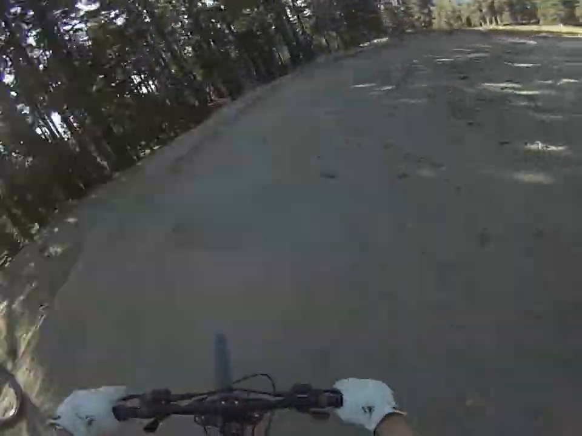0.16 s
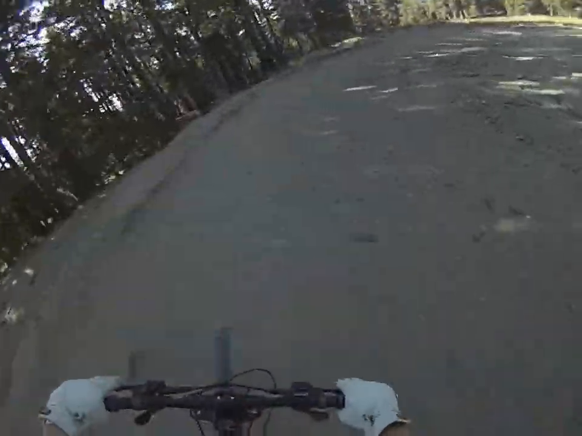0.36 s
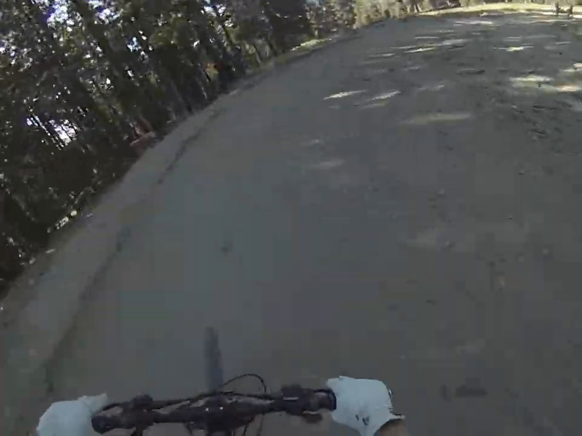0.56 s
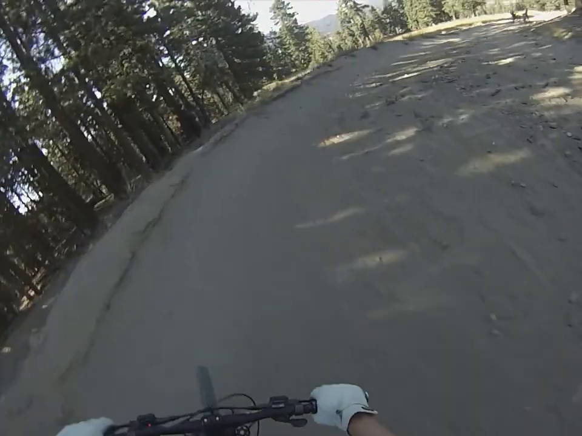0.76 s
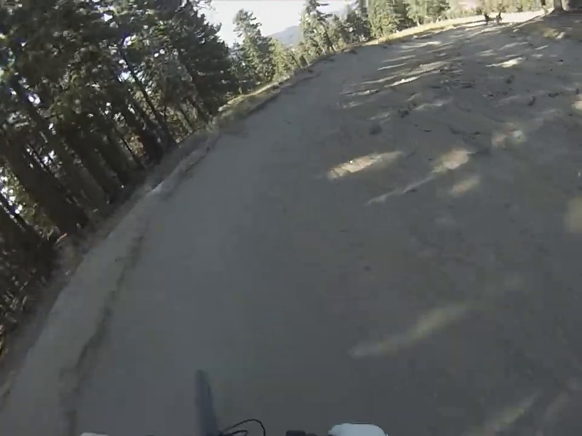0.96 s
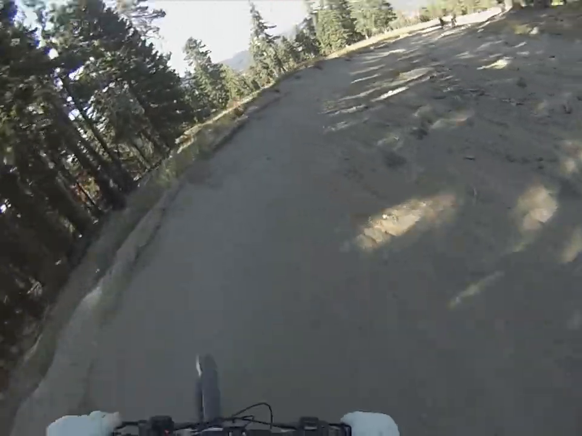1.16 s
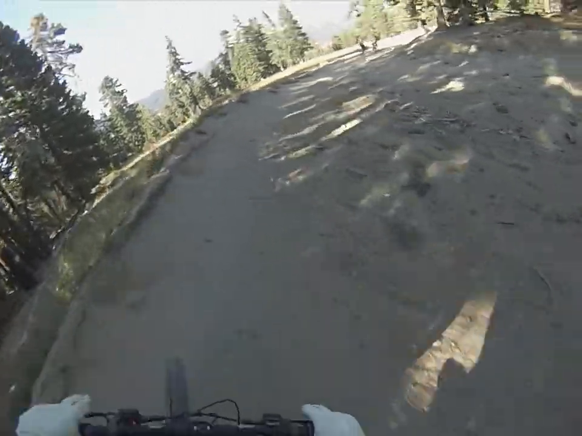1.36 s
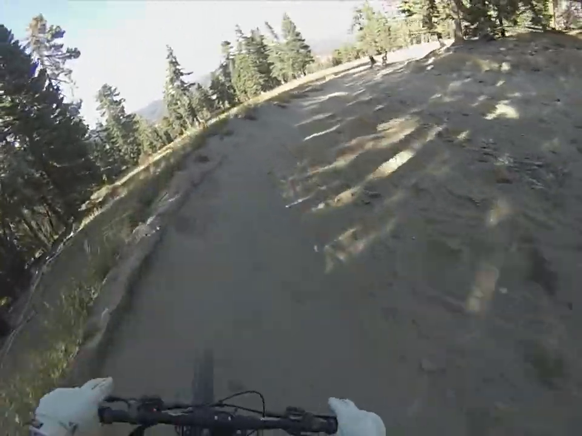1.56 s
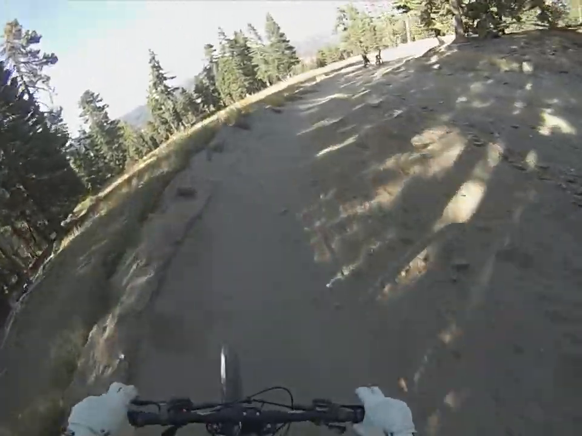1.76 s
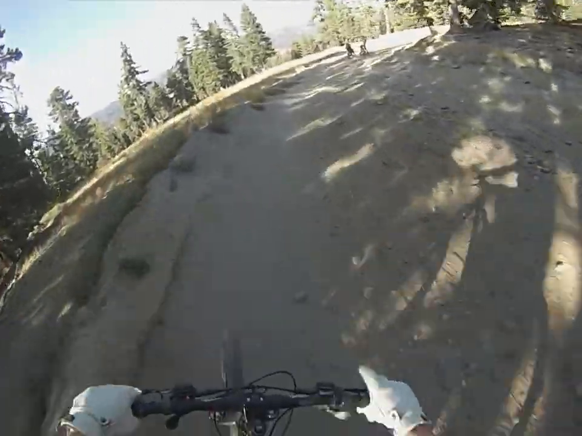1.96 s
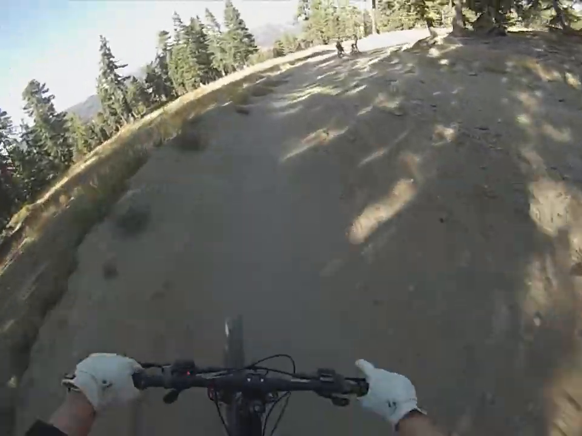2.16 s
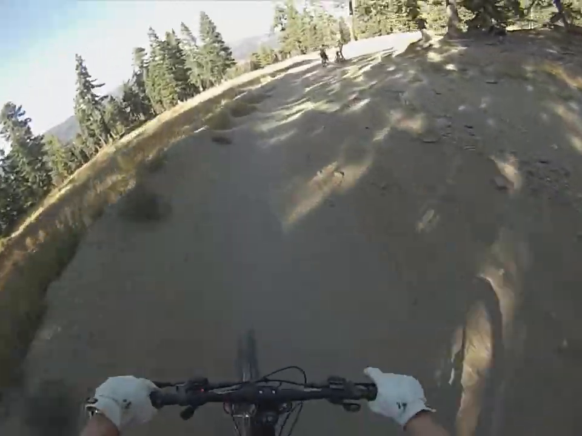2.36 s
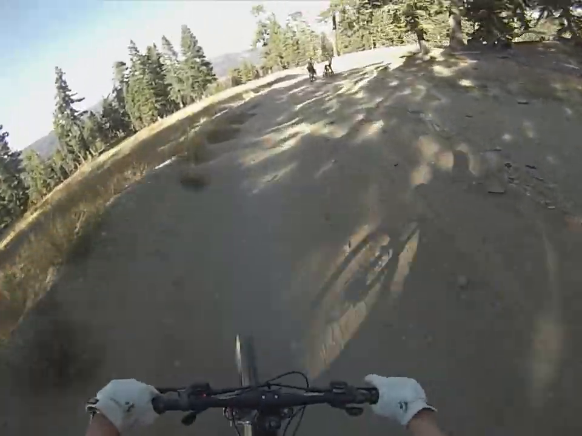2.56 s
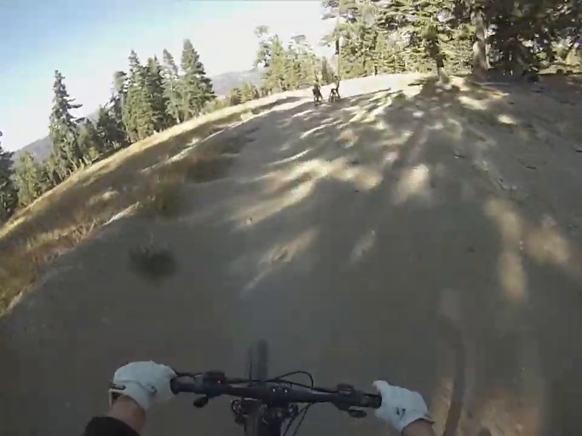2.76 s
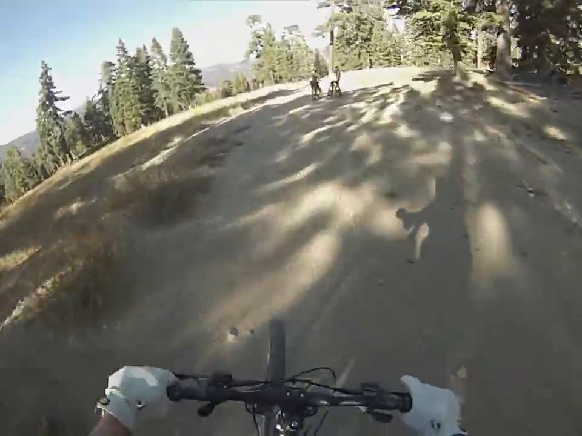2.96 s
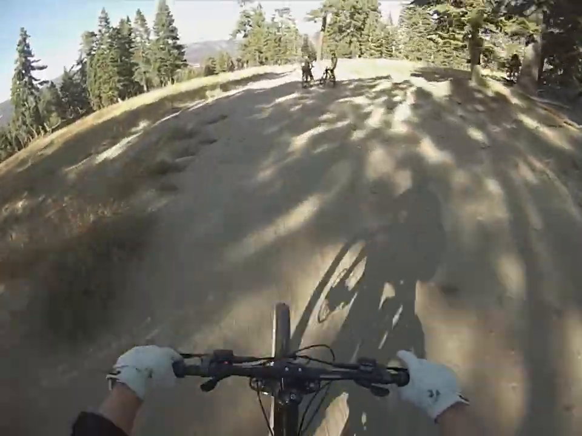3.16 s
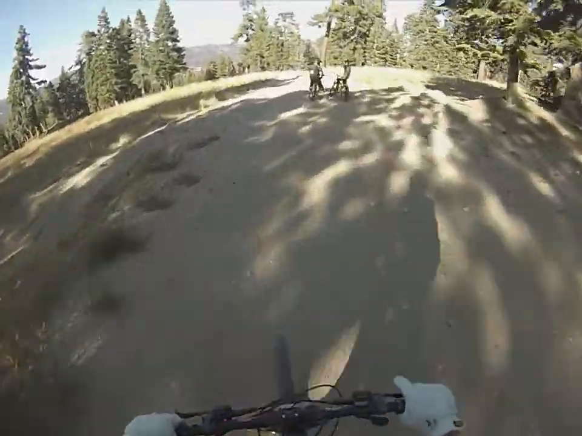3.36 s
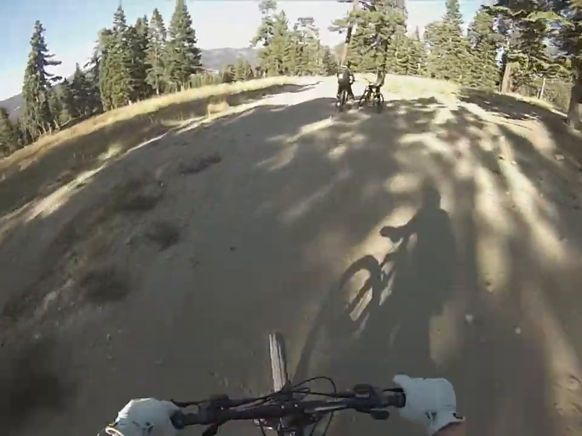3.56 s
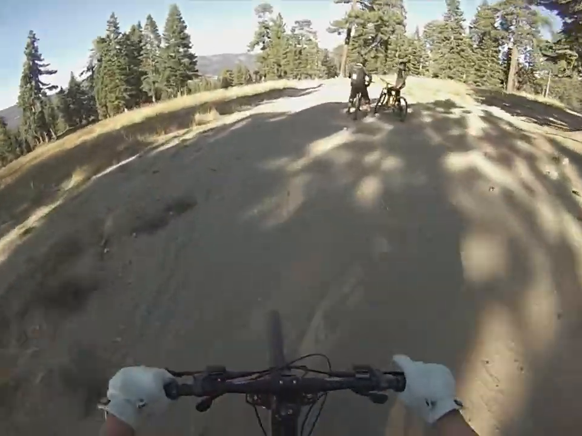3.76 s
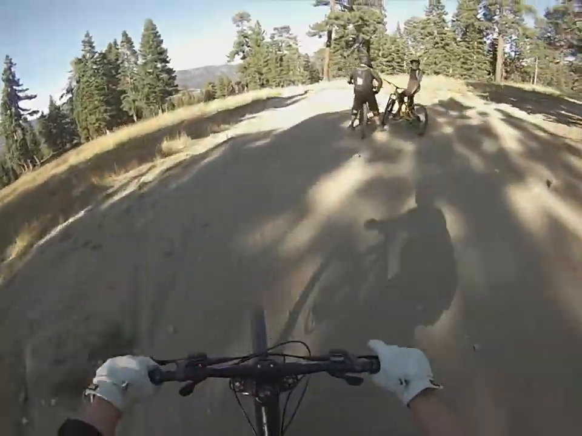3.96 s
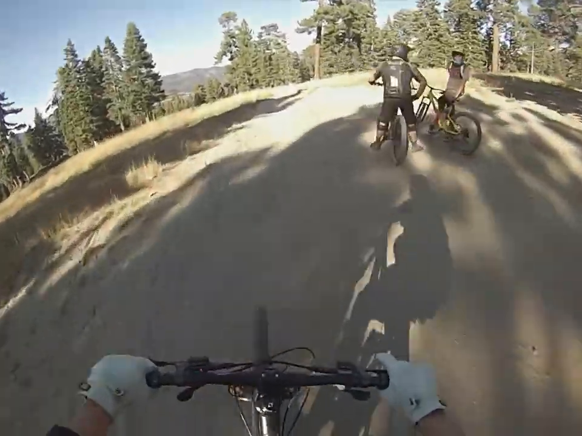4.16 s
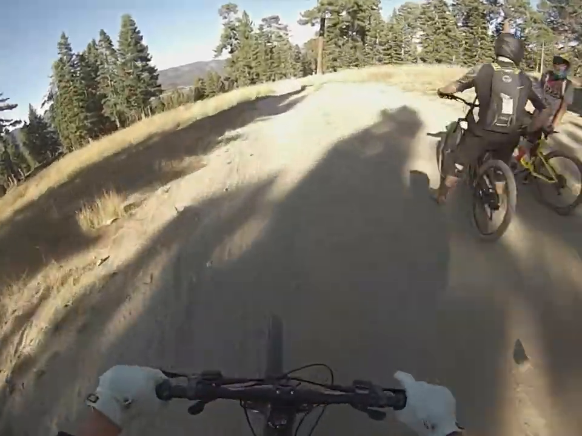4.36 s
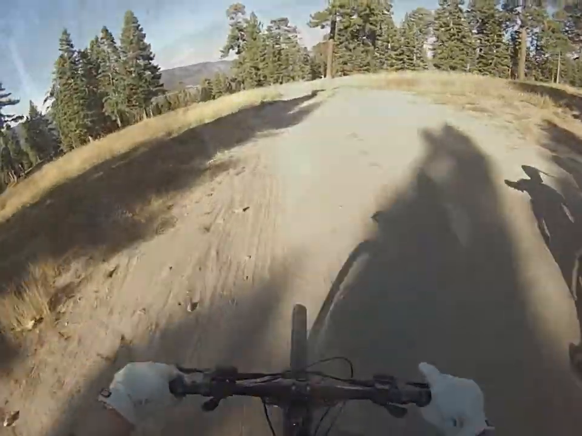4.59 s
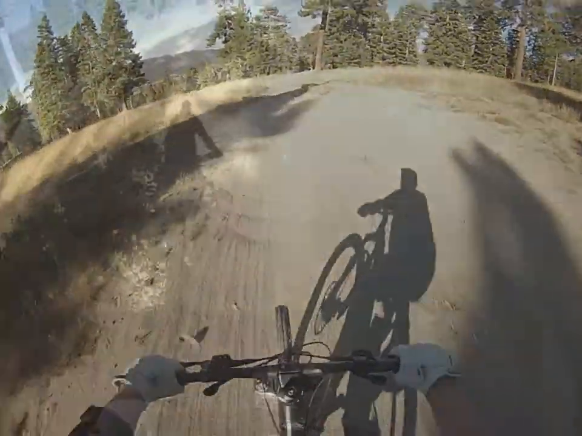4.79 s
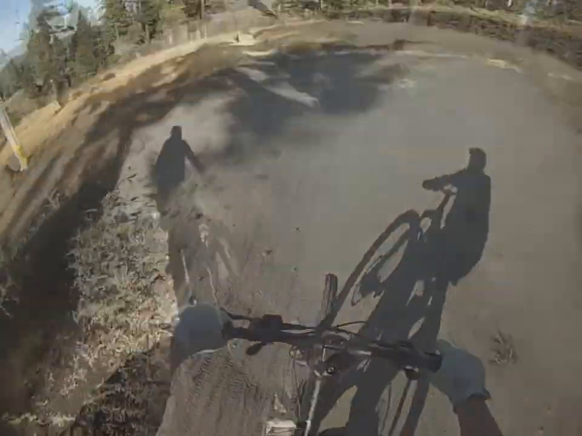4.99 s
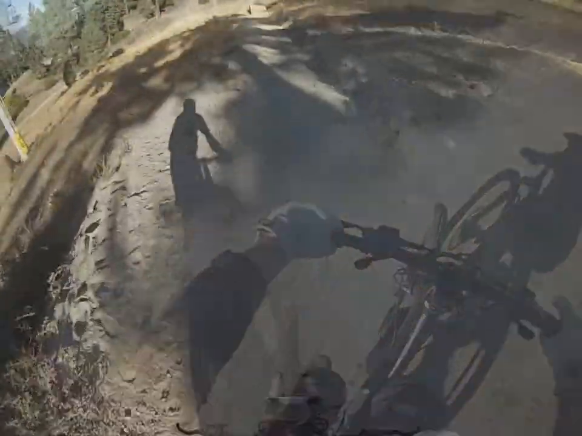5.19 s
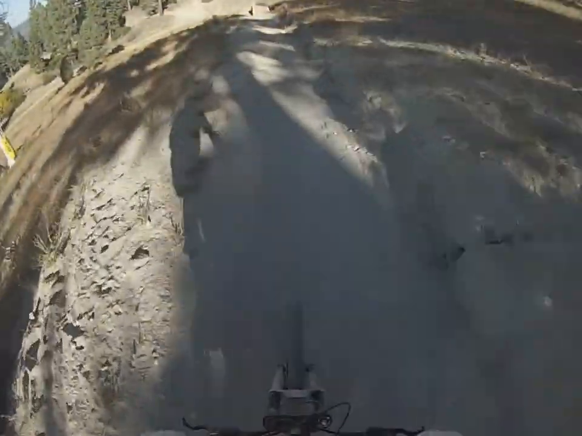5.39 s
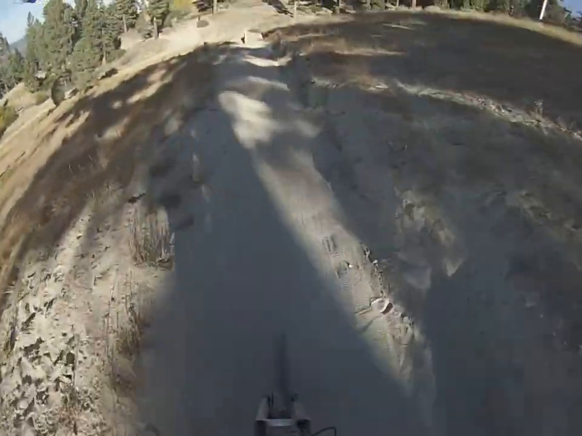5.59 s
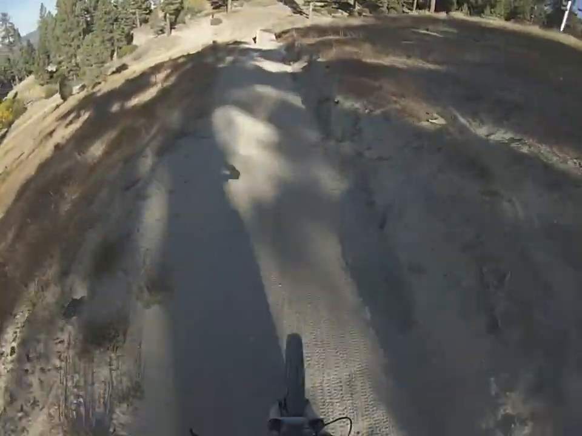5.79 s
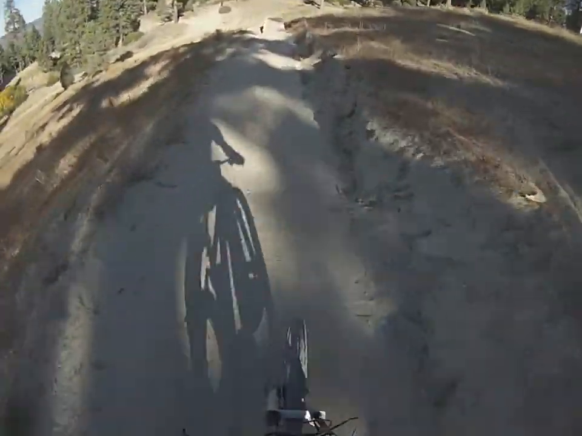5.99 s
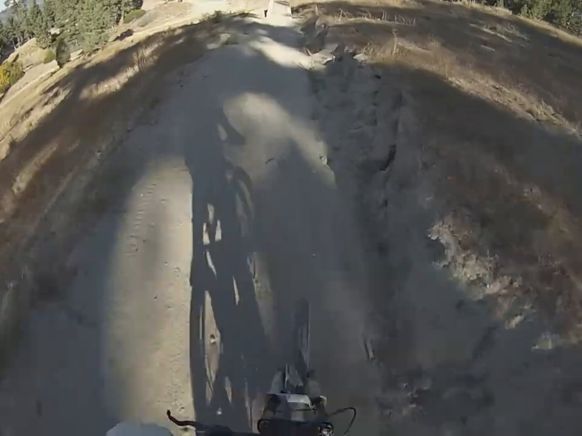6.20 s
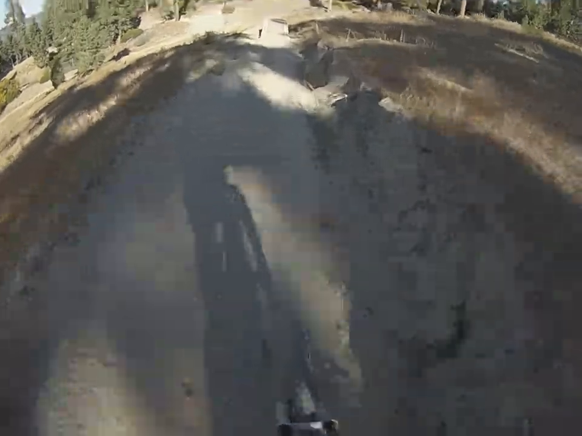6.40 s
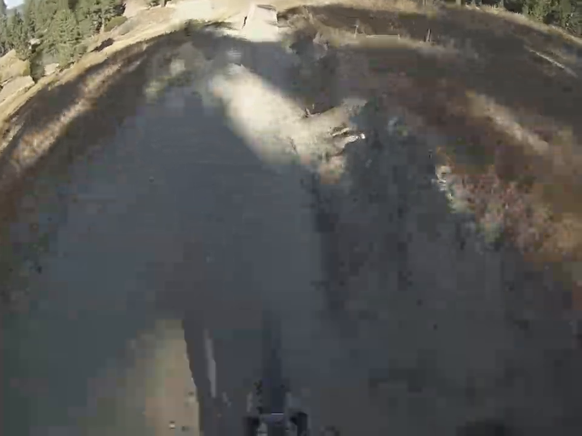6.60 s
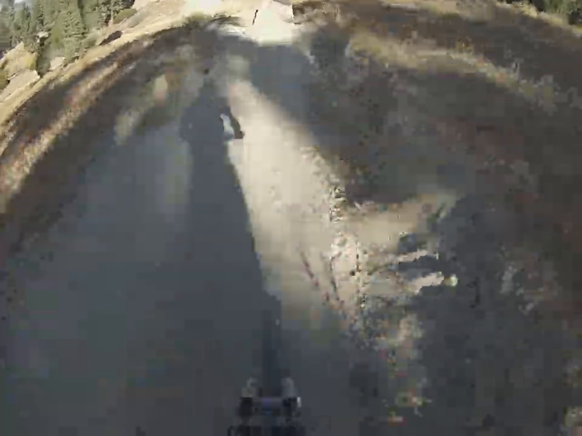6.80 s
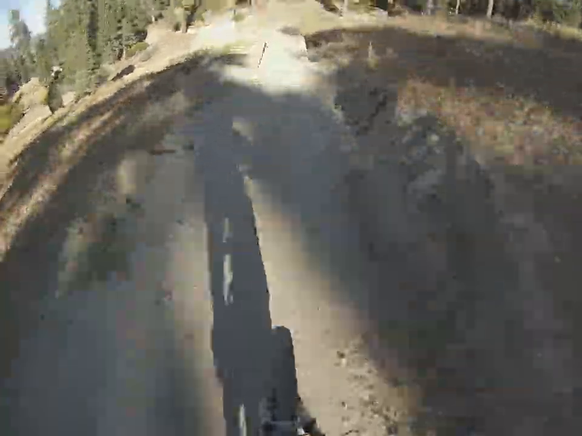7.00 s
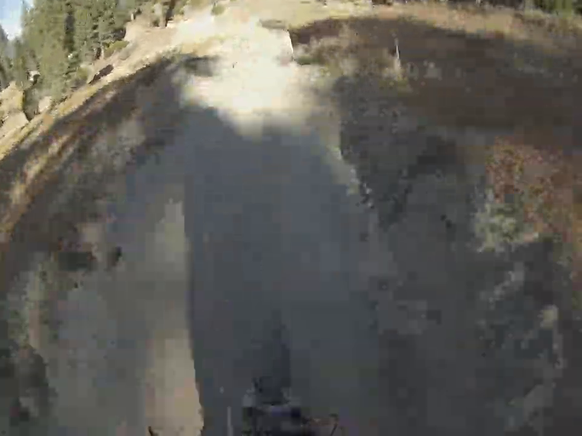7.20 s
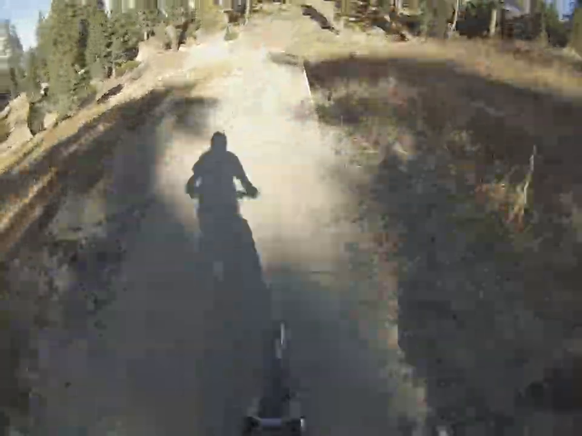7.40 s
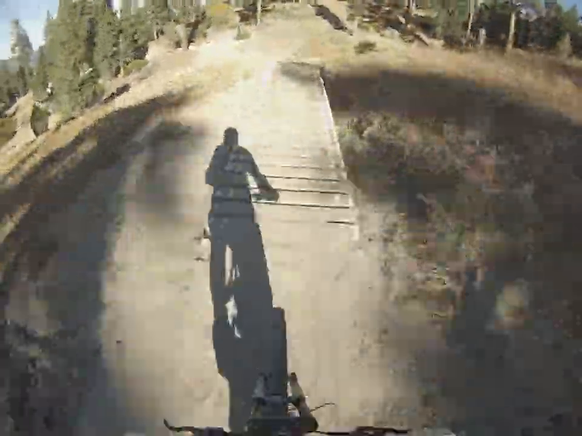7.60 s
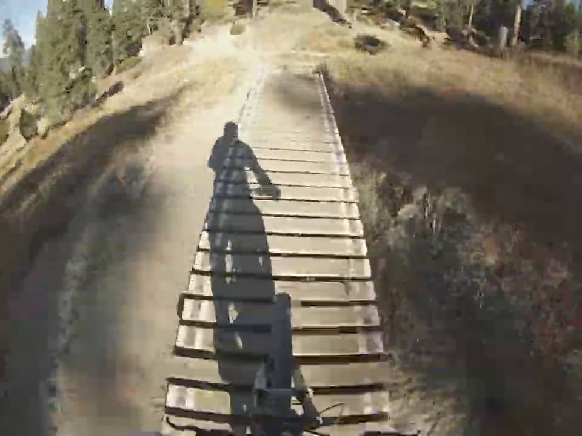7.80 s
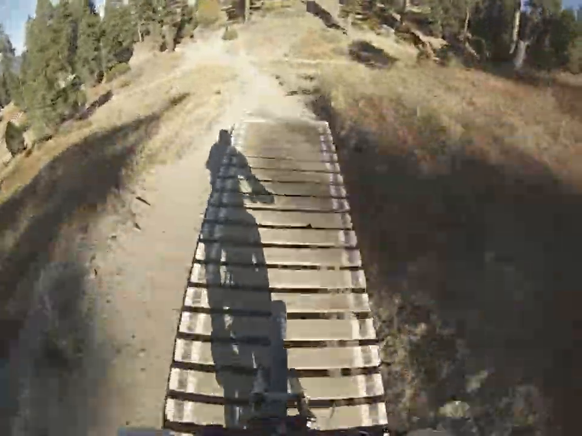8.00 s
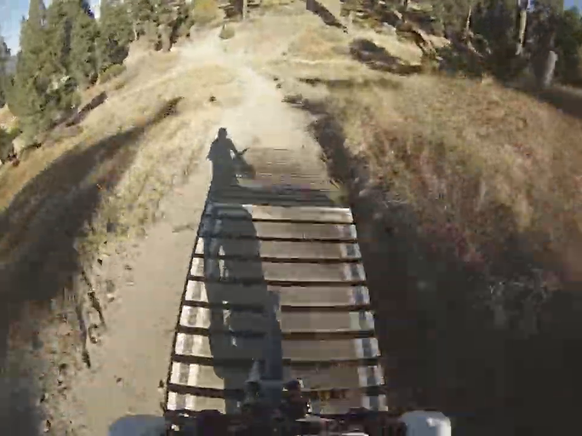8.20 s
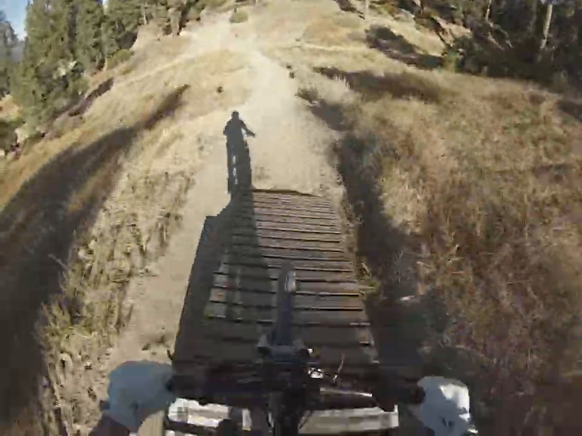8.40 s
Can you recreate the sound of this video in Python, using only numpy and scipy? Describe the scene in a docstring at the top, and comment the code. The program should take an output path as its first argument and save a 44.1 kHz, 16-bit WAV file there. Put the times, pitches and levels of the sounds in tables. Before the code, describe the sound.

A mountain bike runs fast down a dirt trail, heard close from the rider. Deep, gusty wind buffets the microphone over a rough tyre roar, hissing grit, chattering chain and scattered stone pings. Bumps bring low thuds and chain slaps around 0.4 seconds and repeatedly from 1.2 to 2.2 seconds. The wind eases near 2.5 seconds and swells again by 3.7. The tyres boom in hollows from 4.5 seconds and scrub briefly at about 5. At 5.7 seconds the bike lands a jump with a loud, hard clunk, chain clatter and a short metallic ring. Rolling noise and wind drop away for almost a second, then return stronger by 6.7 seconds with a run of hollow frame thumps. Heavy knocks hit at about 7.8 seconds as the bike meets a wooden ramp, and the tyres roar on with stone clicks until about 8.5 seconds.

```python
"""Mountain bike on a dirt trail

A fast run, a jump and a wooden ramp, heard from a camera on the rider. Wind buffets the microphone,
knobbly tyres roar and throw grit, chain and cables chatter, stones ping off the frame. Bumps shake the
camera mount, boom in the tyres, slap the chain and thump in the hollow frame. The bike lands with a
hard clunk, and the rolling noise dips for a second."""
import sys
import numpy as np
from scipy import signal
from scipy.fft import rfft, irfft, next_fast_len
from scipy.io import wavfile
from scipy.ndimage import uniform_filter1d

SR = 44100
rng = np.random.default_rng(int(sys.argv[2]) if len(sys.argv) > 2 else 0)


def generate_wav(sig):
    """Save sig (samples, or channels by samples) to the path in sys.argv[1] as 16-bit PCM at SR."""
    pcm = np.round(np.clip(np.atleast_2d(sig).T, -1, 1) * 32767).astype(np.int16)
    wavfile.write(sys.argv[1], SR, pcm)


N = 372644
TIME = np.arange(N) / SR
LANDING_S = 5.748
JOLT_POWER = 1.35  # hard bumps count for more

# trail surface: t/s, tyre roar/dB, loose dirt/dB
TRAIL = [(0.0, -43, -57.5), (0.36, -42, -63.5), (0.5, -43.5, -69), (0.87, -39.5, -65.5),
         (1.25, -41.5, -68.5), (1.68, -39.5, -58), (1.89, -36.5, -63.5), (2.18, -39.5, -63.5),
         (2.56, -42.5, -68), (3.1, -41.5, -64.5), (3.85, -39.5, -64), (4.13, -37, -63),
         (4.43, -37.5, -62.5), (4.85, -37.5, -57.5), (5.24, -46, -68), (5.6, -40.5, -64), (6.2, -39, -57),
         (6.68, -33.5, -56.5), (6.928, -33.5, -58), (7.51, -38, -59), (7.686, -32.5, -54.5),
         (7.974, -36, -62), (8.45, -31, -58.5)]
# bumps in the trail: t/s, strength/dB
BUMPS = [(0.322, -17.5), (0.414, -9), (0.815, -16), (1.246, -11.5), (1.607, -14), (1.655, -11),
         (1.711, -15), (1.81, -14), (2.165, -20), (2.235, -15), (3.834, -21.5), (4.912, -13), (5.664, -2.5),
         (5.703, -4), (6.619, -16.5), (6.67, -15), (6.777, -12.5), (6.829, -12.5), (7.045, -16),
         (7.175, -5), (7.287, -8), (7.778, -4), (7.862, -6)]
# spectrum of thrown sand: f/Hz, level/dB
SAND_SPECTRUM = [(1000, 9), (2600, -30), (3250, -1), (3900, 13.5), (4700, 10.5), (5800, 5.5), (7100, 3.5),
                 (8800, -7.5), (11000, -7), (13000, -26), (16000, -27)]


def gain_of(db):
    """Decibels to amplitude."""
    return 10 ** (np.asarray(db) / 20)


def unit_rms(x):
    """Scales to rms 1."""
    return x / np.sqrt(np.mean(x ** 2) + 1e-20)


def strike(x, db):
    """Scales a short sound to the energy of a 4 ms blow at the given level."""
    return gain_of(db) * x / np.sqrt(np.sum(x ** 2) / (0.004 * SR))


def add(mix, start_s, sound):
    """Mixes a sound in at start_s."""
    part = mix[max(round(start_s * SR), 0):][:len(sound)]
    part += sound[:len(part)]


def level(table, column):
    """Gain over time along one dB column."""
    rows = np.array(table)
    return gain_of(np.interp(TIME, rows[:, 0], rows[:, column]))


def envelope(start_s, rise_s, hold_s, fall_s):
    """Trapezoid from 0 to 1 and back."""
    rising = (TIME - start_s) / rise_s
    falling = 1 - (TIME - start_s - rise_s - hold_s) / fall_s
    return np.clip(np.minimum(rising, falling), 0, 1)


def band(x, lo_hz, hi_hz, order=3):
    """Causal band-pass."""
    sos = signal.butter(order, [lo_hz, min(hi_hz, SR / 2 - 1)], "band", fs=SR, output="sos")
    return signal.sosfilt(sos, x)


def colour(x, spectrum, size=4096):
    """Minimum-phase filter with the given spectrum; output rms 1."""
    hz, db = np.transpose(spectrum)
    bin_hz = abs(np.fft.fftfreq(size, 1 / SR))
    log_gain = np.log(gain_of(np.interp(np.log(bin_hz + 1), np.log(hz), db)))
    response = np.fft.ifft(np.exp(np.conj(signal.hilbert(log_gain)))).real
    return unit_rms(signal.oaconvolve(x, response[:size // 2])[:len(x)])


def wander(rate_hz):
    """Random drift up to about rate_hz; rms 1."""
    size = next_fast_len(N, real=True)
    lowpass = np.exp(-(np.fft.rfftfreq(size, 1 / SR) / rate_hz) ** 2)
    return unit_rms(irfft(rfft(rng.standard_normal(size)) * lowpass, size)[:N])


def impacts(per_s, spread_db, cap):
    """Random tiny impacts; sizes span cap times spread_db."""
    size = gain_of(spread_db * np.minimum(rng.exponential(1, N), cap))
    return unit_rms(size * rng.choice([-1, 1], N) * (rng.random(N) < per_s / SR))


def burst(decay_s, rise_s=0.00047):
    """Contact noise that builds up and dies away."""
    t = np.arange(SR // 10) / SR
    return rng.standard_normal(len(t)) * np.exp(-t / decay_s) * (1 - np.exp(-t / rise_s))


def ring(hz, decay_s):
    """A struck part rings briefly on the given pitches, in random phase."""
    t = np.arange(SR // 25) / SR
    hz = np.array(hz)[:, None]
    modes = np.sin(2 * np.pi * (hz * t + rng.random(hz.shape)))
    return modes.sum(0) * np.sqrt(t) * np.exp(-t / decay_s)


def grains(per_s, lo_hz, hi_hz, ring_s, spread_db, modes=18):
    """Random small contacts, each a dry ring on its own pitches."""
    out = np.zeros(N)
    for when, size, *pitches in rng.random((round(per_s * N / SR), modes + 2)):
        hz = lo_hz * (hi_hz / lo_hz) ** np.array(pitches)
        add(out, when * N / SR, gain_of(spread_db * size ** 3) * ring(hz, ring_s))
    return unit_rms(out)


def landing_dip(depth_db=-17):
    """Gain that drops after the landing, stays low and returns."""
    return gain_of(depth_db * envelope(LANDING_S, rise_s=0.054, hold_s=0.52, fall_s=0.45))


def tyre_load(lag_s=0.0068, decay_s=0.028):
    """Each bump presses the tyres down in one short swell."""
    out, t = np.zeros(N), np.arange(-SR // 8, SR // 8) / SR
    for s, db in BUMPS:
        add(out, s + lag_s + t[0], gain_of(JOLT_POWER * db) * np.exp(-np.abs(t) / decay_s))
    return out


def wind(gain_db=1.0, gusts_db=1.5):
    """Eddies buffet the microphone with a deep, gusty flutter."""
    # eddy spectrum: f/Hz, level/dB
    spectrum = [(12, -5), (24, 4.5), (38, 5.5), (54, -6), (68, -33), (110, -24.5), (200, -27), (500, -72)]
    # airstream at the microphone: t/s, level/dB
    airstream = [(0.0, -30.5), (1.2, -32), (1.84, -26), (2.52, -37), (3.69, -29), (5.11, -29), (5.3, -36),
                 (6.1, -47), (6.4, -33.5), (6.71, -26.5), (7.9, -26.5), (8.45, -33.5)]
    eddies = colour(rng.standard_normal(N), spectrum, size=16384)
    swell = np.sqrt(uniform_filter1d(eddies ** 2, SR // 8) + 1e-9)
    gusts = gain_of(gain_db + gusts_db * wander(27.0))
    return gusts * level(airstream, 1) * unit_rms(eddies / np.sqrt(swell))


def grit(ground, load, gain_db=1.5, load_db=-42, bumpy_db=3.0):
    """Sand hisses under the tread; coarser grains crackle."""
    crackle = gain_of(-7) * grains(per_s=90, lo_hz=2600, hi_hz=15000, ring_s=0.0009, spread_db=14)
    sand = rng.standard_normal(N) + crackle
    spray = np.hypot(gain_of(gain_db) * level(TRAIL, 2), gain_of(load_db) * load)
    return spray * colour(sand * gain_of(bumpy_db * ground), SAND_SPECTRUM)


def stone_hit(crack_db, snap_db, spot_db=3):
    """A dry crack with a bright snap; each spot hit has its own colour."""
    # crack spectrum: f/Hz, level/dB
    spectrum = [(900, 0.5), (1800, 4), (2700, 9), (3300, 2), (7000, -6.5), (16000, -52)]
    hz, db = np.transpose(spectrum)
    spot = np.transpose([hz, db + spot_db * rng.standard_normal(len(hz))])
    snap = band(burst(0.001, 0.001), 5800, 14000, order=2)
    crack = colour(burst(0.0015, 0.0008), spot)
    return strike(crack, crack_db) + strike(snap, snap_db)


def pebbles(clumps_per_s=5, clump_s=0.012, per_clump=3):
    """The tread spits clumps of small stones, harder on looser dirt."""
    out = np.zeros(N)
    for when in rng.random(round(clumps_per_s * N / SR)):
        for _ in range(per_clump):
            add(out, when * N / SR + clump_s * rng.random(), stone_hit(crack_db=4, snap_db=-10))
    return level(TRAIL, 2) * out


def chatter(ground, load, gain_db=8.0, load_db=-35, roar_power=0.62, dirt_power=0.55, bumpy_db=1.0):
    """Chain and cables jiggle, more on rough, loose trail; links tick on each rise."""
    # chain and cable spectrum: f/Hz, level/dB
    spectrum = [(600, -36), (1150, -6), (1680, 7), (1950, -4), (2300, 2.5), (2700, 0), (3400, -15.5),
                (7000, -64)]
    ticks = grains(per_s=60, lo_hz=1500, hi_hz=2750, ring_s=0.0015, spread_db=7)
    links = gain_of(-7) * np.clip(ground, 0, 1) * ticks
    jiggle = landing_dip() ** 0.23 * impacts(per_s=3000, spread_db=1.1, cap=0.86)
    roughness = level(TRAIL, 1) ** roar_power * level(TRAIL, 2) ** dirt_power
    shaking = np.hypot(gain_of(gain_db) * roughness, gain_of(load_db) * load)
    return shaking * gain_of(bumpy_db * ground) * colour(jiggle + links, spectrum)


def tyres(ground, load, gain_db=1.0, load_db=-23, bumpy_db=1.5,
          cavity_hz=223, hum_db=-14, waver=0.0506, sing_s=0.033):
    """Knobs patter on dirt; the air ring in the tyre hums, and sings on hard ground."""
    # tread spectrum: f/Hz, level/dB
    spectrum = [(50, -9), (110, 0), (165, -11), (223, 2.5), (280, -6), (335, -3), (410, -11.5),
                (580, -10.5), (730, -17), (900, -16), (1100, -23.5), (1450, -17), (2700, -29.5),
                (3300, -69.5)]
    # singing on hard patches: t/s, level/dB
    hard_patches = [(1.51, -34), (1.85, -34.5), (2.02, -35), (2.57, -32), (4.25, -40.5), (8.15, -28)]
    knobs = impacts(per_s=2500, spread_db=0.59, cap=2.3)
    patter = colour(knobs * gain_of(bumpy_db * ground), spectrum)
    cavity = np.sin(2 * np.pi * np.cumsum(cavity_hz * (1 + waver * wander(14.78))) / SR)
    hum = unit_rms(cavity * gain_of(1.6 * wander(1.1)))
    singing = sum(gain_of(db) * np.exp(-((TIME - s) / sing_s) ** 2) for s, db in hard_patches)
    roar = np.hypot(gain_of(gain_db) * level(TRAIL, 1), gain_of(load_db) * load)
    return roar * (patter + gain_of(hum_db) * hum) + singing * cavity


def tyre_scrubs(judder_db=3, spray_db=-19, rise_s=0.0014, fall_s=0.025):
    """Rubber judders over packed dirt and throws up sand."""
    # slips in the turn and on the lip of the jump: t/s, hold/s, level/dB
    slips = [(1.488, 0.026, -43.5), (4.971, 0.036, -33.5), (5.033, 0.02, -36), (5.071, 0.0046, -41.5)]
    # slipping rubber spectrum: f/Hz, level/dB
    spectrum = [(300, -14), (600, 7.5), (900, 4), (1100, 0), (1420, 11), (1850, -1), (2600, 2), (3300, -80)]
    slipping = sum(gain_of(db) * envelope(s, rise_s, hold_s, fall_s) for s, hold_s, db in slips)
    judder = impacts(per_s=1650, spread_db=3.4, cap=0.6) * gain_of(judder_db * wander(52))
    sand = colour(impacts(per_s=4500, spread_db=8.0, cap=7.3), SAND_SPECTRUM)
    return slipping * (colour(judder, spectrum) + gain_of(spray_db) * sand)


def stones(crack_gain_db=-11, ping_gain_db=4, ping_power=1.713, ring_s=0.0006):
    """Larger stones crack against the frame; harder hits ping more."""
    # stone hits: t/s, crack/dB, snap/dB, ring f/Hz
    hits = [(0.123, -27, -54, 6950), (0.335, -32.5, -68, 6800), (1.05, -22, -35, 5070),
            (1.505, -33.5, -59, 5800), (1.7932, -29, -56, 6700), (2.09, -30.5, -75, 5000),
            (2.3199, -24.5, -51, 5500), (2.716, -26, -42, 6340), (2.8118, -26, -42, 5000),
            (2.929, -44, -49.5, 10600), (3.3384, -29, -41.5, 4900), (3.582, -28, -51, 3920),
            (4.3249, -32.5, -59, 6760), (4.5246, -27, -54, 6800), (4.711, -30.5, -61, 6900),
            (4.9684, -31.5, -49, 4400), (5.482, -35.5, -67, 6940), (5.5348, -31.5, -59, 7190),
            (6.285, -38.5, -70, 3320), (6.877, -40, -48, 8100), (7.1076, -30, -49, 4070),
            (7.6232, -21.5, -34, 6320), (7.719, -29, -45.5, 5960), (8.215, -30.5, -47, 6100),
            (8.257, -31.5, -48, 5000), (8.3507, -29, -57, 3860)]
    out = np.zeros(N)
    for s, crack_db, snap_db, hz in hits:
        add(out, s, stone_hit(crack_db + crack_gain_db, snap_db))
        add(out, s, strike(ring([hz], ring_s), ping_power * crack_db + ping_gain_db))
    return out


def chain_slaps(gain_db=1, ring_s=0.0017, gap_s=0.014, lo_hz=1500, hi_hz=2600, clacks=4, modes=4):
    """The chain clacks on its stay and rebounds, mostly weaker each time."""
    # slaps: t/s, level/dB, change per rebound/dB
    slaps = [(0.42, -34.5, -3), (0.583, -36.5, -27), (1.2514, -35, -3.5), (1.315, -41, -7),
             (1.484, -55, -12), (1.612, -39.5, -0.5), (1.813, -34.5, -6.5), (2.175, -35.5, -5),
             (2.988, -42.5, -3), (3.2533, -45, -16), (3.695, -42, 0), (4.5488, -35, -4),
             (4.623, -35.5, -18), (5.1108, -45, 0.5), (5.666, -27, -4), (5.839, -47, -19), (6.14, -57, -7),
             (6.317, -46, -3.5), (6.65, -39.5, -2), (6.781, -34.5, -1.5), (7.2913, -33.5, -2),
             (7.7809, -28.5, -2)]
    out = np.zeros(N)
    for s, db, rebound_db in slaps:
        for k in range(clacks):
            hz = lo_hz + (hi_hz - lo_hz) * (np.arange(modes) + rng.random(modes)) / modes
            add(out, s, strike(ring(hz, ring_s), db + gain_db + k * rebound_db))
            s += gap_s * (0.5 + rng.random())
    return out


def tyre_booms(width_s=0.013, lo_hz=75, hi_hz=140):
    """Tyre casings boom as they are squashed into hollows."""
    # hollows: t/s, level/dB
    hollows = [(0.43, -34), (1.65, -38), (4.55, -28.5), (4.68, -29.5), (4.929, -28.5), (5.699, -21)]
    swell = sum(gain_of(db) * np.exp(-((TIME - s) / width_s) ** 2) for s, db in hollows)
    return swell * unit_rms(band(rng.standard_normal(N), lo_hz, hi_hz, order=2))


def frame_thumps(detune=0.083, rise_s=0.00074, upper_hz=1000):
    """The hollow frame rings, differently each time; hard contact wakes its upper modes."""
    # frame modes: f/Hz, level/dB, t60/s
    frame_modes = [(328, 2, 0.058), (450, -0.5, 0.074), (1406, 2.5, 0.034), (1540, 8, 0.017)]
    # jolts to the frame: t/s, level/dB, contact hardness/dB
    jolts = [(4.933, -26, -11), (5.8375, -28.5, -6), (6.647, -32, -12.5), (6.783, -26, -7),
             (6.807, -30, -20), (7.147, -26, -8), (7.242, -27, -11), (7.293, -21, -16), (7.807, -13, -5.5)]
    out, t = np.zeros(N), np.arange(SR // 6) / SR
    hz, db, t60_s = np.transpose(frame_modes)[:, :, None]
    for s, level_db, hardness_db in jolts:
        pitch_hz = hz * (1 + detune * rng.standard_normal(hz.shape))
        decay = gain_of(db + hardness_db * (hz > upper_hz) - 60 * t / t60_s)
        modes = decay * np.sin(2 * np.pi * (pitch_hz * t + rng.random(hz.shape)))
        add(out, s, strike(modes.sum(0) * (1 - np.exp(-t / rise_s)), level_db))
    return out


def bumps(mount_hz=40, swell_s=0.021, shudder_db=-14, thud_db=-17, lag_s=0.0046):
    """Each bump swings the camera on its mount, with a low shudder and a tyre thud."""
    out, t = np.zeros(N), np.arange(SR // 3) / SR
    swing = -np.sin(2 * np.pi * mount_hz * t) * (t / swell_s * np.exp(1 - t / swell_s)) ** 2
    for s, db in BUMPS:
        shudder = band(burst(0.028, 0.03), 57, 227, order=2)
        thud = band(burst(0.016, 0.0035), 200, 400)
        add(out, s, gain_of(db) * swing)
        add(out, s, strike(shudder, db + shudder_db))
        add(out, s + lag_s, strike(thud, JOLT_POWER * db + thud_db))
    return out


def blows(thud_gain_db=6, knock_gain_db=4, clash_gain_db=-1, bright_gain_db=-19, ring_gain_db=3):
    """Tyre thuds, frame knocks, metal parts clash; the landing leaves one part ringing."""
    # blows that reach the frame: t/s, clash/dB, thud/dB, knock/dB, knock f/Hz
    hits = [(5.7163, -13.5, -19, -21, 1040), (5.7449, -15, -19.5, -12, 870),
            (7.1229, -32.5, -23.5, -33.5, 850), (7.8056, -24, -15.5, -28.5, 1340),
            (7.863, -29, -17, -23, 910)]
    # modes of a metal part such as a brake disc: f/Hz, level/dB, t60/s
    metal_modes = [(1880, -46, 0.3), (2772, -45, 0.11)]
    out, t = np.zeros(N), np.arange(SR // 2) / SR
    for s, clash_db, thud_db, knock_db, knock_hz in hits:
        thud = band(burst(0.0069, 0.0019), 163, 425)
        knock = band(burst(0.0012), 0.76 * knock_hz, 1.3 * knock_hz)
        clash = band(burst(0.0025, 0.001), 1650, 2620, order=5)
        bright = band(burst(0.0026), 4000, 4960, order=2)
        add(out, s, strike(thud, thud_db + thud_gain_db))
        add(out, s, strike(knock, knock_db + knock_gain_db))
        add(out, s, strike(clash, clash_db + clash_gain_db))
        add(out, s, strike(bright, clash_db + bright_gain_db))
    for hz, db, t60_s in metal_modes:
        add(out, LANDING_S, gain_of(db + ring_gain_db - 60 * t / t60_s) * np.sin(2 * np.pi * hz * t))
    return out


def scene():
    """Wind, trail and bike at one microphone."""
    ground, load = wander(26), tyre_load()  # uneven ground drives tyres, chain and grit together
    rolling = tyres(ground, load) + chatter(ground, load) + grit(ground, load) + pebbles()
    mix = wind() + landing_dip() * rolling + tyre_scrubs()
    mix += bumps() + tyre_booms() + blows() + frame_thumps() + chain_slaps() + stones()
    return mix[None]


def record(dry, knee_order=8, cutoff_hz=15900):
    """Soft overload on the peaks, then a low-pass."""
    limited = dry / (1 + dry ** knee_order) ** (1 / knee_order)
    lowpass = signal.firwin(511, cutoff_hz, window=("kaiser", 9), fs=SR)
    return signal.oaconvolve(limited, lowpass[None], "same")


dry = scene()
out = record(dry)
generate_wav(out)
```